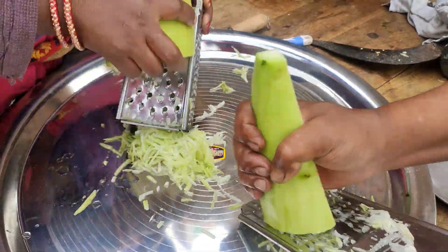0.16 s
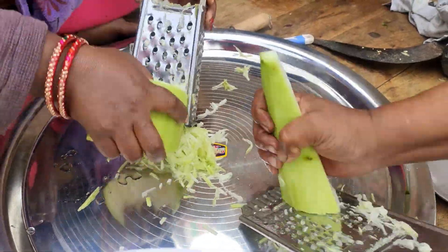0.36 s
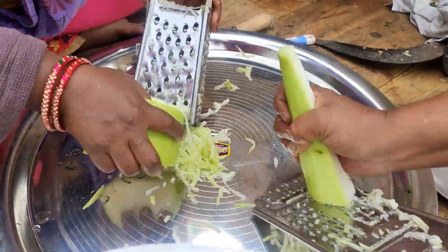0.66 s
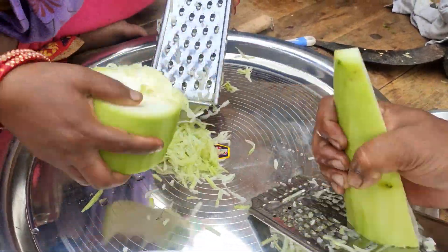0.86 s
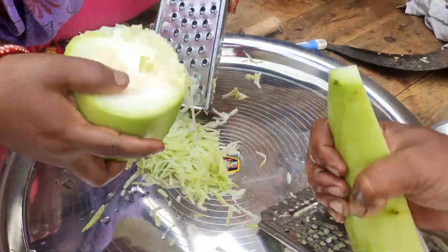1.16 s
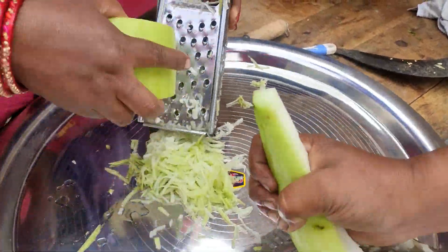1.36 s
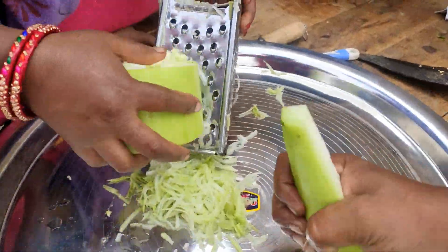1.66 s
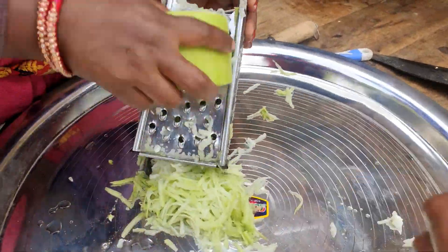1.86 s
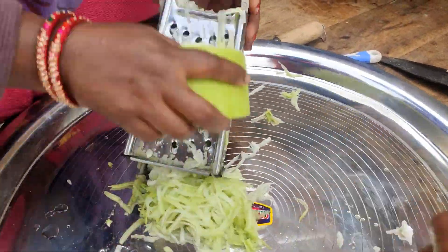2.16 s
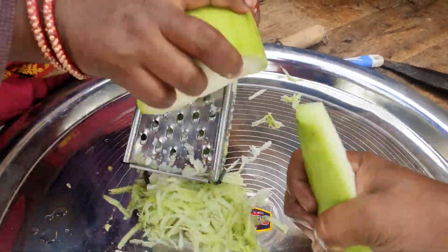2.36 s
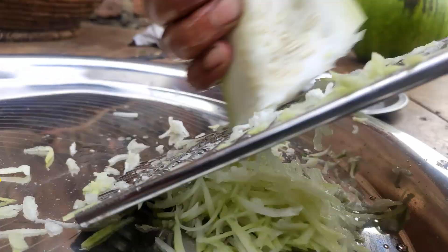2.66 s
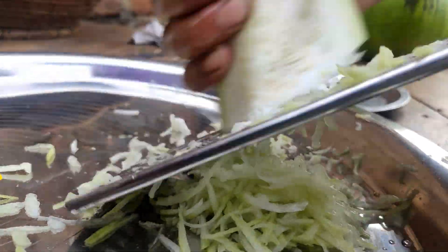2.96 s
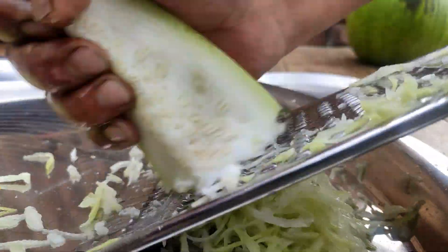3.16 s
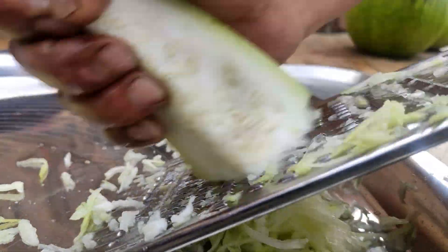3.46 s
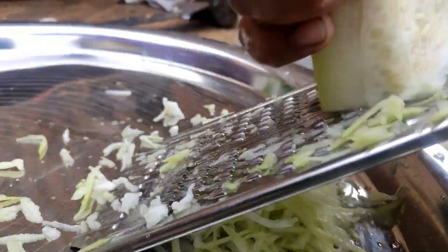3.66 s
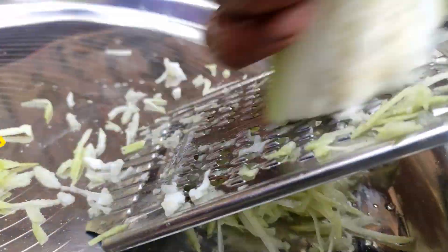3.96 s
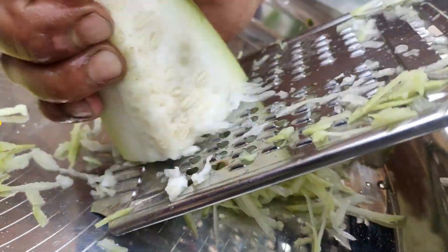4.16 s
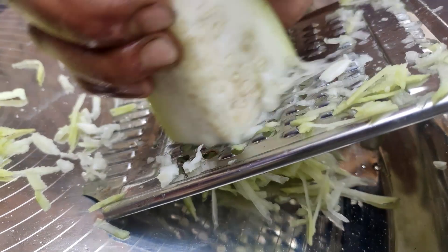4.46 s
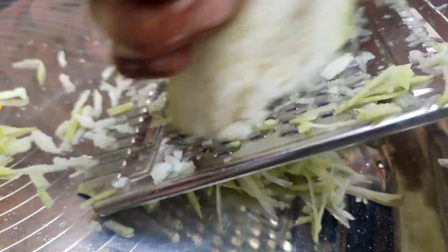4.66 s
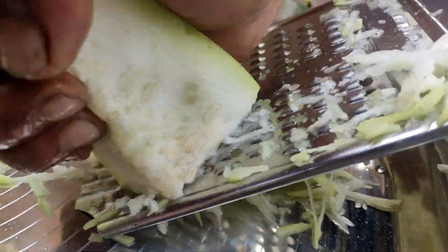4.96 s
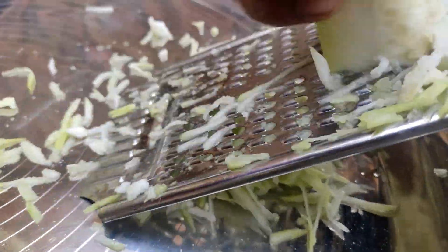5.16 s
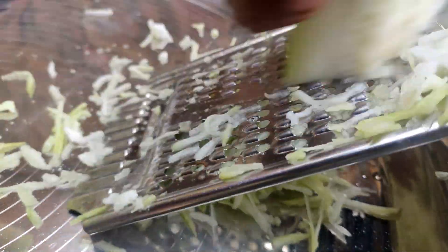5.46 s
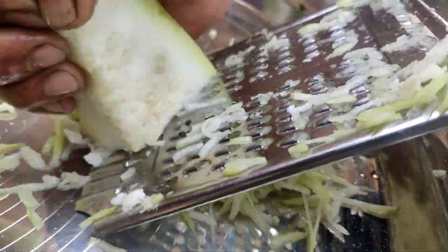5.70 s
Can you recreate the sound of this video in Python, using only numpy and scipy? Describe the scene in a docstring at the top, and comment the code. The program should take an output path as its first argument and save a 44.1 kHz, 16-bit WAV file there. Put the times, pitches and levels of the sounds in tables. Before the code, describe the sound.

Wet, crunchy gourd rasps in quick short strokes over thin steel graters, with metallic plate knocks, low thuds and tiny bangle ticks, growing heavier.

```python
"""Grating gourd on steel graters

Two people grate gourd on steel graters that stand in a wide steel plate. Each pass is a dense crackle of
tearing pulp that rings the steel sheet, shakes the grater and excites the plate. Low thuds decay as the gourd
lands or the grater's foot knocks, and these blows ring plate modes; shreds snap as noise bursts and bangles
tick with short high modes, over a growing low rumble, faint room noise and a short tail."""
import sys
import numpy as np
from scipy import signal
from scipy.fft import rfft, irfft
from scipy.io import wavfile
from scipy.ndimage import uniform_filter1d

SR = 44100
rng = np.random.default_rng(int(sys.argv[2]) if len(sys.argv) > 2 else 0)


def transcribe(signal):
    """Save signal, clipped to [-1, 1], as a 16-bit WAV file at the path in sys.argv[1]."""
    frames = np.atleast_2d(signal).T
    limited = np.clip(frames, -1, 1)
    pcm = np.round(limited * 32767).astype(np.int16)
    wavfile.write(sys.argv[1], SR, pcm)


N = 257103
T = np.arange(N) / SR  # time axis, s
HZ = np.fft.rfftfreq(N, 1 / SR)  # frequency axis, Hz


def amp(db):
    """Decibels to gain."""
    return 10 ** (np.asarray(db) / 20)


def unit(x):
    """Scales to rms 1."""
    return x / np.sqrt(np.mean(x ** 2) + 1e-20)


def read(points, hz):
    """Reads a table on a log-frequency axis."""
    f, value = np.transpose(points)
    return np.interp(np.log(hz + 1), np.log(f + 1), value)


def over_time(points):
    """Reads a table of (time, value) as a straight-line curve over the scene."""
    return np.interp(T, *np.transpose(points))


def colour(x, db):
    """Filters x by a gain curve in dB, then scales to rms 1."""
    return unit(irfft(rfft(x) * amp(db), N))


def pair(x, likeness):
    """Mixes two unrelated signals into a partly alike left and right."""
    c = np.clip(likeness, -.99, .99)
    shared = np.sqrt((1 + c) / 2) * x[0]
    opposed = np.sqrt((1 - c) / 2) * np.array([x[1], -x[1]])
    return shared + opposed


def noise(spectrum, likeness):
    """Stereo noise of a given spectrum."""
    white = rng.standard_normal((2, N))
    return colour(pair(white, likeness), read(spectrum, HZ))


def add(mix, s, sound):
    """Adds a stereo sound at time s."""
    part = mix[:, max(round(s * SR), 0):][:, :sound.shape[1]]
    part += sound[:, :part.shape[1]]


def dying(t, t60):
    """Falls by 60 dB in t60."""
    return np.exp(-np.log(1000) * t / t60)


def catches(per_s, t60, spread_db, steady):
    """Force on the teeth: each bites suddenly and lets go, over a steady drag."""
    sizes = amp(spread_db * np.minimum(rng.exponential(1, N), 3))
    bites = (rng.random(N) < per_s / SR) * sizes
    biting = signal.oaconvolve(bites, dying(T[:SR // 10], t60))[:N]
    return unit(abs(steady + unit(biting)))


def crackle(per_s, spread_db):
    """Bursting cells: tiny clicks of uneven size, scattered differently to each side."""
    size = amp(spread_db * np.minimum(rng.exponential(1, (2, N)), 4))
    return (rng.random((2, N)) < per_s / SR) * size * rng.choice([-1, 1], (2, N))


def teeth(per_s, t60, spread_db, count=48):
    """Each tooth that lets go plucks its own patch of the sheet: brief rings of scattered pitch."""
    out, t = np.zeros((2, N)), T[:SR // 16]
    hz = np.geomspace(450, 7000, count) * rng.uniform(0.98, 1.03, count)
    for when, which, size, left, right in rng.random((int(per_s * N / SR), 5)):
        f = hz[int(which * count)]
        phase = np.array([[left], [right]])  # cycles
        # t60 holds at 1 kHz; higher patches ring shorter and louder
        ring = np.sin(2 * np.pi * (f * t + phase)) * dying(t, t60 * np.sqrt(1000 / f))
        size_db = -spread_db * np.log(size + 0.029)
        add(out, when * N / SR, amp(size_db) * ring * f / 1000)
    return unit(out)


def patches(shape, across, along):
    """Colour that shifts as the contact slides: noise smoothed across frequency bins and along frames."""
    across_bins = uniform_filter1d(rng.standard_normal(shape), across, 0)
    return unit(uniform_filter1d(across_bins, along, 1))


def stroke_db(t):
    """Hiss, scrape and shake levels at times t: each pass presses in, swells or eases, and lets go."""
    # passes of the gourd over the teeth; the three levels are relative: start_s, length_s,
    # full_pressure_after_s, release_t60_s (ring-on adds to it), swell_start_to_end_db, hiss_db, scrape_db, shake_db
    passes = [ (0, 0.056, 0.0098, .16, -9, -47, -45, -39), (0.045, 0.097, 0.049, 0.2, -3, -36, -38, -34),
              (.215, 0.13, 0.038, 0.16, -17.5, -44, -49.5, -38),
              (0.343, .14, 0.044, .13, -4.5, -36.5, -36.5, -35),
              (.507, 0.094, .02, 0.23, -4.5, -48.5, -44, -37),
              (0.628, 0.16, 0.053, 0.1, -1.5, -37.5, -40.5, -34),
              (0.904, 0.047, .03, .12, -8, -44, -45.5, -34), (0.995, 0.09, 0.04, 0.096, -8, -41, -46, -43),
              (1.166, .13, 0.016, .16, -5, -57, -49, -46),
              (1.291, 0.095, 0.049, .06, -0.5, -37.5, -42, -34),
              (1.428, 0.023, .011, .1, -1, -44.5, -48, -55), (1.528, 0.12, 0.043, .16, -2, -50, -43.5, -44),
              (1.649, 0.079, 0.037, 0.076, 1, -36, -41.5, -35.5),
              (1.749, 0.16, .012, 0.23, 16.5, -55, -48.5, -43.5),
              (1.964, 0.082, 0.043, .11, 1.5, -32.5, -31.5, -30.5),
              (2.125, 0.11, .011, .16, 4.5, -48.5, -43, -32.5),
              (2.248, 0.24, 0.097, 0.21, -20.5, -39.5, -37.5, -31),
              (2.507, 0.073, 0.032, 0.05, 0, -40.5, -37.5, -33.5),
              (2.632, .042, 0.045, 0.03, 1, -42, -35.5, -39.5),
              (2.737, 0.093, 0.025, 0.1, 1, -52.5, -38.5, -36.5),
              (2.875, 0.077, 0.045, .16, -2.5, -33, -38, -33),
              (3.067, 0.15, 0.0062, .16, -4, -46, -43.5, -40),
              (3.208, .15, 0.035, 0.23, -4.5, -34.5, -39.5, -38.5),
              (3.401, 0.077, 0.034, 0.11, -8.5, -41, -38.5, -34),
              (3.527, .13, .042, .07, -4.5, -40, -36.5, -41.5),
              (3.718, 0.1, 0.023, 0.2, -18, -50, -33.5, -29.5),
              (3.843, 0.095, .018, 0.22, 8.5, -41.5, -41, -37.5),
              (4.025, 0.1, 0.037, 0.16, -2.5, -45, -42, -34.5),
              (4.154, .15, 0.11, .06, -5, -36.5, -39.5, -41), (4.358, 0.11, .035, .09, -1, -45, -48, -39),
              (4.516, 0.17, 0.055, 0.076, -8, -36.5, -39, -30.5),
              (4.781, 0.11, 0.014, 0.15, -11, -43, -46.5, -39),
              (4.904, 0.096, 0.06, 0.23, -1, -29, -35, -27.5),
              (5.01, 0.17, 0.022, .16, -3, -46.5, -42.5, -30),
              (5.18, 0.086, .03, 0.098, 0.5, -30.5, -35, -25),
              (5.318, .11, 0.043, 0.13, 3, -31.5, -35.5, -28),
              (5.444, 0.081, 0.036, 0.062, 1, -30, -33.5, -24.5),
              (5.55, 0.11, 0.03, 0.092, 7.5, -41, -46.5, -34.5),
              (5.696, 0.15, 0.064, .16, -12, -27, -31.5, -26.5), ]
    # hiss, scrape and shake in turn, ringing on and while the gourd rests: added_t60_s, rest_level_db (relative)
    ring_on = [(.01, -63.5), (.09, -54), (.18, -49)]
    start, length, rise, release, swell_db, *levels = np.transpose(passes)[:, :, None]
    since = t - start
    swell = amp(swell_db * (np.clip(since / length, 0, 1) - .5))
    pressure = np.clip(since / rise, 0, 1) * swell
    after = np.maximum(since - length, 0)
    curves = []
    for db, (ring, rest_db) in zip(levels, ring_on):
        strokes = amp(db) * pressure * dying(after, release + ring)
        power = (strokes ** 2).sum(0) + amp(rest_db) ** 2
        curves.append(10 * np.log10(power))
    return curves


def grating():
    """The teeth tear the flesh into fine and coarse crackle (hiss) and ring the steel sheet (scrape)."""
    # where the work is heard, positive to the left: time_s, left_minus_right_db
    position = [(0.0, -0.5), (0.96, 0.0), (1.57, -1), (2.61, 0.5), (2.87, -1.5), (3.67, -2), (4.59, -2.0),
                (5.23, 1.5), (5.38, -0.5), (5.55, 2), (5.83, 0)]
    # relative colour of the rasp at equal hiss and scrape: frequency_hz, level_db_per_hz
    rasp_spectrum = [(180, 5), (360, 7.5), (520, 7.5), (650, 7.5), (1100, 5), (1650, 2.5), (1850, 1.5),
                     (3000, 1.5), (4000, 2.5), (6000, 0.5), (8500, 4.5), (11000, 3.5), (14000, 1),
                     (16000, -7.5)]
    force = catches(per_s=130, t60=.026, spread_db=3.5, steady=1.2)
    fine = force * unit(pair(crackle(per_s=11000, spread_db=1.5), 0.014))
    grain = rng.standard_normal((2, 200)) * dying(T[:200], 0.0076)
    coarse = unit(signal.oaconvolve(crackle(per_s=260, spread_db=-2.5), grain, axes=1)[:, :N])
    plucked = teeth(per_s=650, t60=0.078, spread_db=0.5)
    grit = fine + amp(-8.5) * coarse + amp(-11) * plucked

    hz, t, z = signal.stft(colour(grit, read(rasp_spectrum, HZ)), SR, nperseg=256)
    hiss_db, scrape_db, _ = stroke_db(t)
    # share that follows the tearing, not the sheet
    treble = read([(1300, 0.32), (3200, 0.56), (8000, 0.85), (15000, 0.81)], hz)[:, None]
    level_db = treble * hiss_db + (1 - treble) * scrape_db
    shifting_db = 2 * patches(z.shape[1:], across=6, along=9)  # about 1 kHz by 26 ms
    rasp = signal.istft(z * amp(level_db + shifting_db + 4.0), SR, nperseg=256)[1][:, :N]
    side_db = over_time(position)
    return rasp * amp(np.array([side_db, -side_db]) / 2)


def plate(rasp):
    """The scraping passes through the grater's foot and makes the plate resound."""
    # broad resonances of the plate under a scraping grater: frequency_hz, width_hz, level_db
    resonances = [(500, 83, 2), (1040, 100, -11), (1480, 97, -16), (1647, 98, -0.5)]
    # how firmly the grater's foot bears on the plate: time_s, drive_db
    footing = [(0, -11), (1.8, -16), (2.7, -8), (3.2, -4), (4.7, -4.5), (5.0, 5), (5.8, -3.5)]
    response = sum(amp(db) / (1 + 2j * (HZ - hz) / width) for hz, width, db in resonances)
    drive = rasp * amp(over_time(footing))
    return irfft(rfft(drive) * response, N)


def shaking():
    """The juddering gourd shakes the grater; the long leaning one sounds lower than the upright one."""
    # relative body colour of the upright grater: frequency_hz, level_db_per_hz
    upright_spectrum = [(35, -19), (70, 10.5), (110, 5), (160, 4.5), (215, -4), (270, -7), (380, -12.5),
                        (600, -44)]
    # relative body colour of the leaning grater: frequency_hz, level_db_per_hz
    leaning_spectrum = [(35, -49), (65, 7), (110, 1), (160, -3.5), (215, -9.5), (280, -15.5), (380, -22.5),
                        (600, -69)]
    leaning_from_s = 2.72
    judder = pair(crackle(per_s=420, spread_db=1.1), 0.99)
    leaning = np.clip((T - leaning_from_s) * 20, 0, 1)  # 50 ms crossfade
    upright_body = colour(judder, read(upright_spectrum, HZ))
    leaning_body = colour(judder, read(leaning_spectrum, HZ))
    body = (1 - leaning) * upright_body + leaning * leaning_body
    t = T[::128]  # coarse steps suffice for the level
    return np.interp(T, t, amp(stroke_db(t)[2] + 0.12)) * body


def rumble():
    """Low noise, nearly alike on both sides, that grows overall as the work goes on."""
    # relative colour of the rumble: frequency_hz, level_db_per_hz
    rumble_spectrum = [(8, -7), (25, -3), (40, -0.5), (52, 0), (70, -5.5), (110, -16.5), (300, -114)]
    # loudness of the rumble: time_s, rms_level_db
    rumble_level = [(0, -41.5), (1.3, -38), (1.8, -38.5), (2.8, -37.5), (3.6, -35.5), (4.6, -31.5),
                    (5.4, -28), (5.83, -29)]
    return amp(over_time(rumble_level)) * noise(rumble_spectrum, 0.98)


def air():
    """The quiet room: faint steady noise, strongest in the lows."""
    # relative colour of the room noise: frequency_hz, level_db_per_hz
    air_spectrum = [(20, 31), (100, 6), (300, 14.5), (1000, -31), (4000, -35), (16000, -84)]
    return amp(-51.5) * noise(air_spectrum, 0.78)


def kitchen(x):
    """A short diffuse tail of decaying noise, its highest treble dying first."""
    # decay of the room: frequency_hz, t60_s
    decay = [(100, 0.11), (500, 0.18), (3000, 0.2), (15000, 0.033)]
    hz, t, z = signal.stft(rng.standard_normal((2, SR // 2)), SR, nperseg=256)
    fading = z * dying(t, read(decay, hz)[:, None]) * (t > 0)
    tail = signal.istft(fading, SR, nperseg=256)[1]
    return signal.fftconvolve(x, tail / np.linalg.norm(tail[0]), axes=1)[:, :N]


def snaps():
    """A shred snaps off a tooth: a sharp bright crack and a short, duller scatter from the plate."""
    # snaps, levels relative within each layer: start_s, bright_level_db, dull_level_db
    snap_events = [(0.0188, -25, -33), (0.643, -18, -30.5), (0.909, -36, -55), (0.9297, -17, -36),
                   (1.268, -20.5, -32), (1.44, -26, -42), (1.574, -15, -28.5), (1.624, -23.5, -47),
                   (2.2192, -14, -30), (2.5256, -21, -32), (2.6698, -17.5, -51), (2.7597, -17, -36),
                   (2.7733, -27, -37), (2.783, -16.5, -43), (2.7934, -29, -46), (2.807, -18, -36),
                   (2.8242, -19, -51), (2.8427, -21.5, -32.5), (3.1467, -24.5, -49), (3.254, -12, -30),
                   (3.7503, -11.5, -27.5), (3.918, -30, -34), (4.539, -23, -31), (4.798, -20, -41),
                   (5.3423, -18, -44)]
    out, t = np.zeros((2, N)), T[:SR // 8]
    bright = noise([(1500, -33), (3500, 0.0), (8000, 8.5), (12000, 2), (16000, -3.0)], 0.065)
    dull = noise([(200, -39), (500, 8.5), (1500, 3), (3000, 3.5), (5000, -11)], 0.066)
    for s, db, dull_db in snap_events:
        at = slice(round(s * SR), round(s * SR) + len(t))
        sharp = amp(db - 12.5) * bright[:, at] * (dying(t, 0.025) + 0.19 * dying(t, 0.029))
        scatter = amp(dull_db - 4.5) * dull[:, at] * dying(t, 0.047)
        add(out, s, sharp + scatter)
    return out


def thuds():
    """A damped low swing of the grater, with a short crunch of bursting cells."""
    # low thuds, as the gourd lands or the foot knocks: start_s, swing_level_db, pitch_hz, t60_s, crunch_level_db
    thud_events = [(0.089, -27, 203.5, 0.36, -40), (.122, -31, 204, 0.14, -41), (.285, -27, 206, 0.16, -52),
                   (0.371, -25.5, 176, 0.097, -47), (0.699, -28, 82.8, 0.42, -30.5),
                   (.718, -21, 223, 0.067, -32.5), (1.338, -17.5, 146.5, 0.12, -21),
                   (1.532, -31.5, 156, 0.14, -40.5), (1.84, -19.5, 197, 0.16, -54),
                   (2.122, -20.5, 200.7, 0.26, -58), (2.193, -20, 150, 0.06, -50),
                   (2.276, -19, 190, 0.14, -33.5), (2.548, -31.5, 197, 0.23, -50),
                   (2.772, -22.5, 89.8, 0.34, -49), (3.078, -27.5, 115, 0.27, -25.5),
                   (3.732, -12.5, 131, 0.085, -18.5), (3.944, -11, 68, 0.037, -53),
                   (4.287, -12.5, 75, 0.042, -49), (4.399, -21.5, 95.5, 0.08, -41),
                   (5.105, -27, 312, 0.066, -40), (5.123, -23, 111, 0.04, -23.5),
                   (5.178, -22.5, 207.4, .13, -46), (5.299, -10, 132, 0.034, -46),
                   (5.375, -33, 328, 0.07, -42), (5.441, -13, 68, 0.081, -48)]
    out, t = np.zeros((2, N)), T[:SR // 3]
    cells = pair(crackle(per_s=8300, spread_db=1.5), 0.032)
    crunch_spectrum = [(100, -31), (280, 14.5), (600, 2.0), (900, 3.5), (2200, 0.0), (5000, -5),
                       (10000, -9.5), (16000, -11.5)]  # Hz, dB per Hz
    crunch = colour(cells, read(crunch_spectrum, HZ))
    for s, db, hz, t60, crunch_db in thud_events:
        low = -np.sin(2 * np.pi * hz * t) * dying(t, t60)
        fifth = 0.076 * np.sin(2 * np.pi * hz * 1.5 * t) * dying(t, t60 * 0.66)
        crunching = crunch[:, round(s * SR):][:, :len(t)] * dying(t, 0.085)
        add(out, s, amp(db) * (low - fifth) + amp(crunch_db) * crunching)
    return out


def bangles():
    """Hard bangles tick together with two very short, high modes and a little noise."""
    # ticks, levels relative to each other: start_s, level_db, pitch_hz
    tick_events = [(0.2082, -26.5, 9140), (0.501, -29.5, 9200), (0.591, -37, 8920), (0.606, -30.5, 8600),
                   (0.8084, -32, 9000), (0.8894, -39, 7920), (0.989, -30.5, 9120), (0.9997, -31, 8250),
                   (1.4834, -30.5, 9100), (1.8726, -22.5, 9100), (1.9094, -31, 8300), (2.1184, -26, 9200),
                   (2.134, -32, 8640), (2.4153, -24, 8900), (2.463, -32.5, 8700), (2.585, -27, 8500),
                   (2.599, -23, 8820), (2.63, -24.5, 8100), (4.0028, -33.5, 9250), (5.1445, -22, 8200),
                   (5.2884, -26, 8000)]
    out, t = np.zeros((2, N)), T[:SR // 30]
    phase = np.array([[0], [np.pi / 2]])  # left, right
    for s, db, hz in tick_events:
        lower = np.sin(2 * np.pi * hz * t + phase)
        upper = 0.64 * np.sin(2 * np.pi * hz * 1.38 * t - phase)
        grit = 0.22 * rng.standard_normal((2, len(t))) * dying(t, 0.02)
        click = (lower + upper) * dying(t, 0.0076) + grit
        add(out, s, amp(db + 5.5) * click * (1 - np.exp(-t / 0.00015)))
    return out


def knocks():
    """The gourd lands on the grater or the foot strikes the plate: each blow rings its own range of modes under
    a noisy crack."""
    # blows: start_s, ring_level_db, centre_of_modes_hz, spread_octaves, crack_level_db
    blows = [(1.337, -23.5, 806, .25, -36), (1.625, -33.5, 1210, 0.93, -31),
             (1.761, -27.5, 900, 0.77, -35.5), (1.79, -29.5, 905, 0.57, -39.5), (1.839, -29, 1100, .7, -34),
             (1.863, -21.5, 630, 0.47, -31), (2.124, -31, 700, 1.2, -50), (2.193, -15.5, 760, 0.76, -38),
             (2.275, -23, 1150, 0.67, -33), (2.291, -26, 900, 0.62, -36), (2.452, -34.5, 1400, 0.52, -54),
             (3.076, -31, 590, 0.64, -52), (3.735, -26, 780, 0.31, -25.5), (4.213, -29.5, 1330, 0.089, -52),
             (4.989, -27, 1510, 0.28, -34), (5.107, -23, 1000, 1.3, -36), (5.138, -22, 1410, 0.26, -37),
             (5.176, -25, 1300, 0.34, -27.5), (5.298, -13, 550, 0.92, -49), (5.372, -25, 900, 1.2, -34)]
    # plate and grater ringing together: mode_hz, relative_level_db, t60_s
    plate_modes = [(245, -9, .09), (492, -7, .26), (512, 1.5, .07), (730, -2, .05), (770, -15, .2),
                   (860, -3, .05), (970, -1, .055), (1010, -17, .18), (1250, -5, .055), (1340, -8, .08),
                   (1440, -5, .065), (1620, -8, .07), (1930, -7, .04), (2200, -9, .05)]
    out, t = np.zeros((2, N)), T[:SR // 3]
    hz, mode_db, t60 = np.transpose(plate_modes)[:, :, None]
    crack = noise([(200, 4), (600, -9.0), (1600, 0.5), (2200, 0), (3300, -6.5), (5000, -11), (12000, -37)], .1)
    # higher modes are further out of step between the sides, in cycles
    sides = np.array([[[1]], [[-1]]]) * np.minimum(hz / 9000, .12)
    for s, db, centre_hz, octaves, crack_db in blows:
        weight = amp(mode_db) * np.exp(-.5 * (np.log2(hz / centre_hz) / octaves) ** 2)
        detune = rng.uniform(.975, 1.025)  # pitch differs a little from blow to blow
        # the phase of upper modes depends on the spot that is hit
        scatter = rng.uniform(-1.04, 1, hz.shape) * np.clip((hz - 500) / 1500, 0, .5)
        modes = np.sin(2 * np.pi * (detune * hz * t + scatter + sides)) * dying(t, t60)
        ring = (weight / np.linalg.norm(weight) * modes).sum(1)
        cracking = crack[:, round(s * SR):][:, :len(t)] * dying(t, 0.059)
        blow = amp(db) * ring + amp(crack_db) * cracking
        add(out, s, blow * (1 - np.exp(-t / .0006)))  # soft onset
    return out


def scene():
    """Work on the graters, a low rumble, and the quiet room."""
    rasp = grating()
    steel = rasp + plate(rasp) + snaps() + bangles() + knocks()
    work = steel + shaking() + thuds()
    return work + amp(-10.0) * kitchen(steel) + rumble() + air()


def record(dry):
    """The width of the microphone pair, then the recorder's band limits."""
    # how wide the pair hears: frequency_hz, left_right_difference_gain_db
    width = [(60, 2.5), (130, 1.5), (230, 1.5), (330, -4.5), (500, -3), (1000, 0.7), (3000, 0.6),
             (8000, 0.5)]
    edge_hz = 16150
    side = irfft(rfft(dry[0] - dry[1]) / 2 * amp(read(width, HZ)), N)
    heard = dry.mean(0) + np.array([side, -side])
    low_cut = signal.butter(1, 10, "high", fs=SR, output="sos")
    high_cut = signal.firwin(511, edge_hz, window=("kaiser", 9), fs=SR)
    return signal.oaconvolve(signal.sosfilt(low_cut, heard), high_cut[None], "same")


dry = scene()
out = record(dry)
transcribe(out)
```